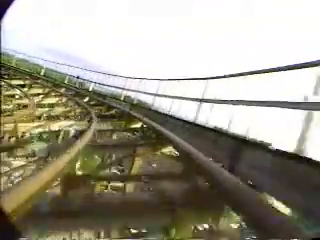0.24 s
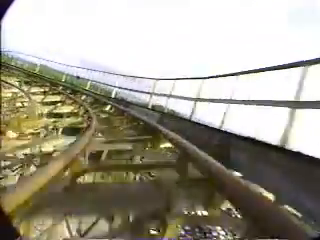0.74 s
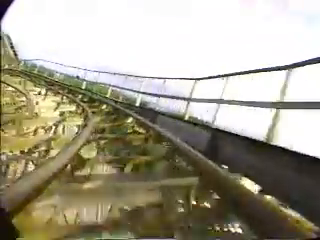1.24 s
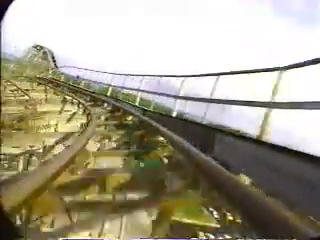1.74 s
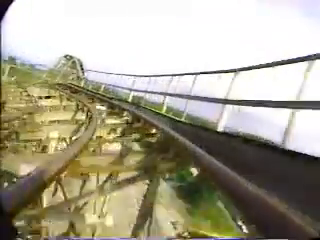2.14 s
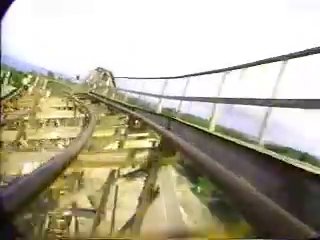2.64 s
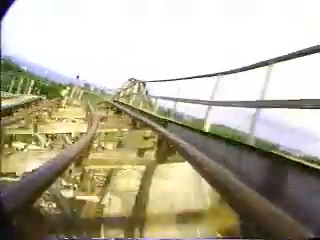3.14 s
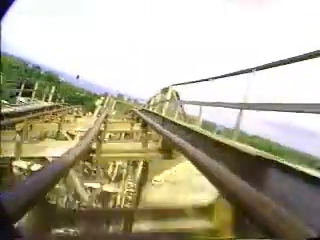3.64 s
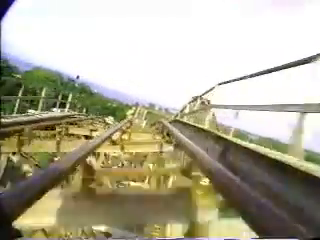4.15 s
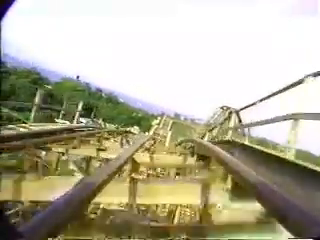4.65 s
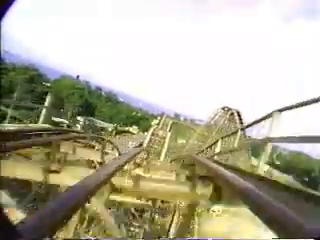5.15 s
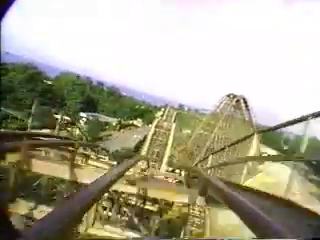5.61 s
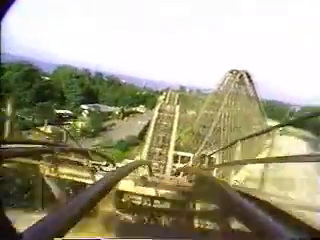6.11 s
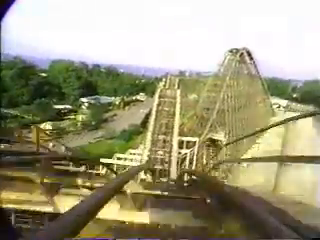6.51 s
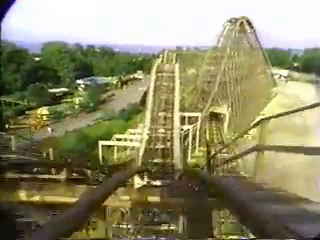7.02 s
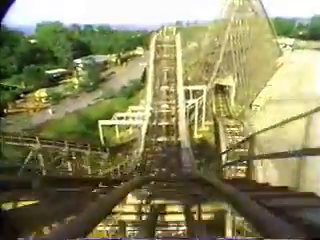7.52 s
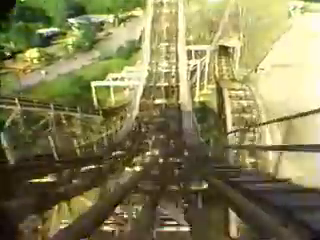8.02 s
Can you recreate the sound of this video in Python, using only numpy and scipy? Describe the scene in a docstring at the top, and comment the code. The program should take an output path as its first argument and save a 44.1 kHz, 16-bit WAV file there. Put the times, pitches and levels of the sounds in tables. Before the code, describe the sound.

A roller coaster train runs at speed on steel track, with a loud low drone, rushing air and wind thudding on the microphone.

```python
"""A roller coaster train at speed on steel track, heard from a camera on its front car.
It opens with slams of wind pressure over the drone of the car and the hiss and whistle of passing air.
The car swings over each support, jolts and chinks; gusts overload the microphone, so each big swing
of pressure flattens, chokes the hiss and comes out as a rough thud. From 5.7 to 7.3 s a raspy whistle
sets in and sags. In the last second drone and airflow swell, up to a final sharp crack and chink."""
import sys
import numpy as np
from scipy import signal
from scipy.fft import rfft, irfft, next_fast_len
from scipy.io import wavfile
from scipy.ndimage import uniform_filter1d, map_coordinates

SR = 44100
rng = np.random.default_rng(int(sys.argv[2]) if len(sys.argv) > 2 else 0)


def store_wav(level_fs):
    """Save 16-bit WAV to argv[1]."""
    pcm = np.round(np.clip(np.atleast_2d(level_fs), -1, 1) * 32767)
    wavfile.write(sys.argv[1], SR, pcm.T.astype(np.int16))


N = 364707
TIME = np.arange(N) / SR
AROUND_S = np.arange(-SR // 5, SR // 5) / SR  # time either side of an event


# Load of the wheels on the rails. Each row: time in seconds, drone level in dB.
WHEEL_LOAD = [(0, -20.5), (.6, -17.5), (1.35, -18.5), (2, -18), (2.9, -18), (3.6, -21.5), (4.35, -22.5),
              (5.15, -20.5), (5.7, -20.5), (6.3, -18.5), (6.75, -16), (7.35, -18), (7.8, -12.5),
              (8.27, -17.5)]
# The car's resonance. Each row: frequency in Hz, density in dB.
CAR_SPECTRUM = [(45, -30), (80, -9), (98, -1.5), (112, -2), (125, 0), (142, -1.5), (165, -21), (200, -17.5),
                (260, -19.5), (370, -30.5), (480, -31), (700, -39), (1500, -49.5)]

def car_drone():
    """Rolling shakes the car's low resonance at a wandering pitch."""
    load_db, = curves(WHEEL_LOAD)
    pitch = 1 + .045 * wobble(11)
    clock_s = np.cumsum(pitch / pitch.mean()) / SR
    resonance = np.interp(clock_s, TIME, noise(CAR_SPECTRUM))
    return amp(load_db) * steady(resonance, window_s=0.04)


# Swings over the track supports. Each row: centre in seconds, pitch in Hz, level in dB.
SUPPORT_SWINGS = [(0.25, 123.7, -23), (0.469, 131.7, -24), (0.93, 114.4, -17), (1.239, 134.6, -17.5),
                  (1.57, 104.5, -19.5), (1.76, 131, -22), (2.05, 129, -19), (2.3, 108.2, -15.5),
                  (2.56, 121.4, -16.5), (2.8, 121.8, -17.5), (2.98, 136.4, -18.5), (3.11, 139.3, -17),
                  (3.32, 121.7, -13.5), (3.62, 122.6, -19.5), (3.75, 115, -19.5), (3.91, 125.2, -17),
                  (4.07, 122.5, -16), (4.23, 119.3, -13.5), (4.46, 114.8, -19), (4.7, 115.6, -19),
                  (4.881, 117.7, -17), (5.3, 124.4, -16.5), (5.49, 127.6, -18), (5.63, 119.5, -20),
                  (5.78, 115.6, -13.5), (5.9, 131.7, -21), (6.12, 121.4, -19.5), (6.55, 125.3, -18.5),
                  (6.85, 134.1, -13), (7.02, 120.5, -20.5), (7.2, 114.8, -19), (7.66, 125.4, -18.5),
                  (7.92, 131.4, -13), (8.19, 134.8, -16)]

def supports(rise_hz_per_s=202, half_s=0.059, stumble_s=0.00082):
    """Each support swings the car unevenly for a dozen cycles; pitch rises as the wheels press in."""
    hum = np.zeros(N)
    envelope = np.exp(-(AROUND_S / half_s) ** 2)
    for (s, hz, db), phase in zip(SUPPORT_SWINGS, rng.random(len(SUPPORT_SWINGS))):
        cycles = phase + hz * AROUND_S + rise_hz_per_s * AROUND_S ** 2 / 2
        add(hum, s, amp(db) * np.sqrt(2) * np.sin(2 * np.pi * cycles) * envelope)
    return np.interp(TIME + stumble_s * wobble(60), TIME, hum)


# Each row: centre in seconds, shake in dB, half length in seconds, rattle in dB.
RAIL_JOLTS = [(0.239, -11.5, 0.011, -24), (0.454, -13.5, 0.0078, -37), (0.507, -6.5, 0.0082, -27.5),
              (0.758, -14, 0.0081, -25), (1.267, -16, .018, -26), (1.369, -8.5, 0.0057, -20.5),
              (1.55, -12, 0.0096, -30), (1.98, -14, 0.012, -24), (2.034, -11.5, 0.036, -24),
              (2.119, -17, 0.011, -25), (2.413, -11, 0.0073, -39), (2.573, -10, .016, -23),
              (2.833, -10, 0.03, -22), (3.111, -13, 0.021, -26), (3.4, -15, 0.015, -28.5),
              (3.496, -9, 0.015, -28.5), (3.631, -10.5, 0.023, -20.5), (3.887, -8.5, 0.015, -28.5),
              (4.424, -8, 0.0095, -23.5), (4.526, -14, 0.017, -28.5), (5.272, -8.5, 0.013, -20),
              (5.307, -16, 0.0077, -22.5), (5.469, -13.5, 0.023, -33.5), (6.506, -11, 0.0083, -27),
              (6.982, -9, 0.008, -25), (7.047, -22, 0.011, -25), (7.104, -12.5, 0.013, -21.5),
              (7.214, -10, 0.02, -20), (7.416, -5, 0.0075, -19), (7.645, -11.5, 0.014, -25),
              (7.924, -7, 0.0089, -29), (8.078, -13.5, 0.0087, -29), (8.192, -13.5, 0.026, -22.5)]

def jolts(drone, swing_top_hz=203):
    """Uneven rail drives the car's own swing much harder and rattles the wheel carriers."""
    low = unit(filtered(drone, lambda hz: 1 / (1 + (hz / swing_top_hz) ** 8)))
    analytic = signal.hilbert(low, next_fast_len(N))[:N]
    swing = analytic.real / np.hypot(np.abs(analytic), .3)  # the drone's phase at near-even height
    shake, rattle = np.zeros((2, N))
    for s, shake_db, half_s, rattle_db in RAIL_JOLTS:
        blow = bump(s, half_s)
        shake += amp(shake_db) * blow
        rattle += amp(rattle_db) * blow
    return shake * swing + rattle * carriers(swing)


# Shaken wheel carriers. Each row: frequency in Hz, density in dB.
CARRIER_SPECTRUM = [(150, -14.5), (265, 5), (400, -4), (600, -7.5), (1000, -18.5), (1800, -26.5)]

def carriers(swing, slap_share=0.58):
    """The wheel carriers slap once on each upward swing and rattle loosely in between."""
    upswings = unit(np.maximum(np.gradient(np.tanh(8 * swing)), 0))
    slaps = unit(coloured(upswings, CARRIER_SPECTRUM))
    return np.sqrt(slap_share) * slaps + np.sqrt(1 - slap_share) * noise(CARRIER_SPECTRUM)


# Each row: time in seconds, shove in dB, build-up in seconds, crack in dB.
PRESSURE_SLAMS = [(0.012, -3, 0.0043, -36.5), (.05, -7.5, 0.0041, -38), (.06, -11, 0.0099, -29.5),
                  (.123, -4, .003, -37), (0.136, -3.5, 0.0089, -38), (0.146, -15, .005, -36.5),
                  (0.177, -10, 0.029, -34), (.21, -8, .009, -33.5), (.234, -8, 0.0049, -32.5),
                  (.269, -6.5, 0.013, -34), (0.277, -4, .004, -25.5), (0.761, -7.5, .009, -26.5),
                  (0.798, -10, 0.011, -33), (1.237, -5, 0.0063, -25.5), (1.372, -12, 0.0047, -25),
                  (1.542, -6.5, 0.0046, -33.5), (2.014, -4, .008, -32.5), (2.095, -10, 0.0098, -31.5),
                  (2.57, -4.5, 0.0053, -27.5), (3.116, -9, 0.0054, -28.5), (3.619, -3.5, 0.0062, -28.5),
                  (5.27, -9.5, 0.0078, -28.5), (6.321, -3.5, 0.0098, -26.5), (6.369, -10, 0.0081, -28.5),
                  (7.093, -10, 0.0027, -28.5), (7.364, -6, 0.0067, -38.5), (7.415, -3.5, 0.0026, -30.5),
                  (7.969, -5.5, .005, -24.5), (8.032, -6.5, .007, -26), (8.11, -7, 0.014, -26),
                  (8.244, -13.5, 0.008, -15)]
# A slam's crack. Each row: frequency in Hz, density in dB.
CRACK_SPECTRUM = [(200, -5), (650, 6), (1400, 1), (2500, -4.5), (5000, -16), (7500, -37)]

def slams(rumble, flip_s=.0012, relax_s=.003, duck_share=.6):
    """Wind pressure slams the microphone: it builds, flips suddenly and cracks; the rumble dips."""
    shove, duck, crack = np.zeros((3, N))
    for s, shove_db, build_s, crack_db in PRESSURE_SLAMS:
        width_s = np.where(AROUND_S < 0, build_s, relax_s)
        envelope = np.exp(-(AROUND_S / width_s) ** 4)
        add(shove, s, amp(shove_db) * np.tanh(AROUND_S / flip_s) * envelope)
        add(duck, s, duck_share * envelope)
        add(crack, s, amp(crack_db) * decay(t60_s=0.0081))
    pressure = rumble * np.clip(1 - duck, 0, 1) + shove
    cracks = coloured(crack * rng.standard_normal(N), CRACK_SPECTRUM)
    return pressure, cracks


# Slow wind pressure. Each row: time in seconds, level in dB.
GUST_LEVELS = [(0, -16), (.2, -10), (.35, -14), (1.3, -13), (1.65, -18.5), (1.95, -9.5), (2.3, -18),
               (4.3, -22), (5.1, -18), (6.3, -19.5), (6.7, -21), (7.8, -14.5), (8.27, -12)]
# Each row: frequency in Hz, density in dB.
GUST_SPECTRUM = [(6, -24), (14, -4), (31, 2), (42, 0), (65, 1), (85, -22.5), (160, -15.5), (400, -56)]

def buffeting():
    """Large eddies press on the microphone, at and below the bottom of hearing."""
    level_db, = curves(GUST_LEVELS)
    return amp(level_db) * steady(noise(GUST_SPECTRUM), window_s=0.22)


# Airflow past the car. Each row: time in seconds, strength in dB.
AIRFLOW = [(0, -2), (.5, -3), (1.1, -0.5), (1.42, 0.5), (1.58, -2), (2, -2.5), (2.5, -1), (2.9, -1.5),
           (3.3, -.5), (4.2, 0), (4.42, 0), (4.55, -3), (4.8, -0.5), (5.4, 0), (5.7, -2), (5.95, 0),
           (6.3, 1.5), (6.6, 2.5), (6.9, 0.5), (7.42, 0), (7.6, 4.5), (8.27, 5.5)]
# Each row: centre in seconds, half length in seconds, extra hiss in dB, extra whistle in dB.
AIR_PUFFS = [(0.108, 0.018, 3, 8.5), (0.302, 0.2, 2.5, -8.5), (0.665, 0.062, 4.5, 7),
             (1.093, 0.048, 3, 5.5), (1.79, 0.051, 2.5, 13), (2.241, 0.025, 3.5, 16),
             (2.359, 0.022, 3.5, 15.5), (2.703, 0.017, 5.5, 12.5), (3.295, .045, 3.5, 5),
             (3.493, 0.066, 0, 7), (3.56, 0.035, 3, 9), (3.757, 0.079, 3, 6), (3.961, 0.045, 5, 6.5),
             (4.11, .03, 3.5, 9), (4.358, 0.094, 2, 9.5), (4.745, 0.027, 5, 10.5), (4.904, 0.055, 3.5, 12),
             (5.543, 0.069, 5.5, 9), (5.825, 0.074, 3, 9), (6.16, 0.071, 2, 6.5), (6.622, 0.11, 1.5, 5),
             (6.94, 0.055, 6, 12), (7.168, 0.016, 5, 11.5), (7.278, 0.057, 5, 10)]
# Body of the hiss. Each row: frequency in Hz, density in dB.
HISS_SPECTRUM = [(150, -2.5), (400, 8), (700, 1), (1200, -0.5), (1450, 2), (2000, -2), (2450, -1.5),
                 (3000, -7), (4300, -9), (8000, -33)]
# Treble of the hiss. Each row: frequency in Hz, density in dB.
FIZZ_SPECTRUM = [(1500, -24), (3000, -2.5), (3800, 0), (4400, 2), (5200, -1), (5700, -5), (7300, -6.5),
                 (8100, -14.5), (8800, -45)]

def airstream():
    """Air over the housing: hiss and whistle flutter together; more flow is louder and brighter."""
    flow_db, = curves(AIRFLOW)
    hiss_db = -37.5 + flow_db
    whistle_db = -51 + 1.7 * flow_db
    relative_fizz_db = -13 + 0.95 * flow_db
    for s, half_s, extra_hiss_db, extra_whistle_db in AIR_PUFFS:
        puff = bump(s, half_s)
        hiss_db += extra_hiss_db * puff
        whistle_db += extra_whistle_db * puff
    flutter = amp(1.6 * wobble(60) + wobble(260))
    hiss = eddies(noise(HISS_SPECTRUM) + amp(relative_fizz_db) * noise(FIZZ_SPECTRUM), depth_db=2.0)
    return flutter * (amp(hiss_db) * hiss + amp(whistle_db) * whistle())


# Each row: centre in Hz, half width in Hz, relative level in dB.
EDGE_TONES = [(3483, 170, -5.5), (4886, 240, 0), (6500, 230, -19), (7240, 180, -18)]

def whistle():
    """Air on the housing's edges sounds breathy tones that waver together; rms 1."""
    drift_s = np.cumsum(.006 * wobble(22)) / SR
    tones = np.zeros(N)
    for centre_hz, width_hz, db in EDGE_TONES:
        band = unit(noise_band(centre_hz, width_hz))
        tones += amp(db + 1.9 * wobble(31)) * band
    wavering = np.interp(TIME + drift_s, TIME, eddies(tones, depth_db=3.0))
    chatter = amp(1.9 * wobble(110))
    return unit(chatter * wavering)


def eddies(x, depth_db):
    """Passing eddies favour narrow bands of x for a few hundredths of a second each; rms 1."""
    spectra = signal.stft(x, nperseg=1024)[2]
    patches = uniform_filter1d(rng.standard_normal(spectra.shape), size=4, axis=0)
    patches = uniform_filter1d(patches, size=6, axis=1)
    return unit(signal.istft(spectra * amp(depth_db * unit(patches)), nperseg=1024)[1][:N])


# Each row: time in seconds, pitch in Hz, level in dB.
WHISTLE_GLIDE = [(5.68, 4910, -75), (5.8, 4850, -46), (6, 4875, -43), (6.07, 4720, -52),
                 (6.14, 4746, -42.5), (6.27, 4690, -44.5), (6.32, 4810, -57), (6.38, 4790, -49),
                 (6.62, 4780, -51), (6.95, 4880, -51.5), (7.3, 4950, -79)]
# Each row: multiple of the pitch, relative level in dB.
WHISTLE_PARTIALS = [(.705, -1.5), (1, -0.5), (1.075, -5.5)]

def ringing_whistle():
    """Air on an edge sounds a narrow, raspy whistle whose partials sag in pitch together."""
    pitch_hz, level_db = curves(WHISTLE_GLIDE)
    pitch_hz *= 1 + 0.0026 * wobble(25)
    partials = sum(amp(db) * rough_tone(ratio * pitch_hz) for ratio, db in WHISTLE_PARTIALS)
    return amp(level_db) * unit(partials)


# Each row: start in seconds, level in dB.
STEEL_TAPS = [(.862, -33.5), (1.349, -37), (1.857, -35.5), (2.061, -35.5), (3.064, -34), (3.263, -41.5),
              (3.495, -29.5), (6.375, -32), (7.156, -28), (8.033, -28), (8.046, -38.5), (8.177, -34),
              (8.244, -22.5)]
# Each row: frequency in Hz, relative level in dB.
STEEL_MODES = [(3480, -5.5), (4100, -11), (4900, 1.5), (6900, -13.5)]

def chinks(attack_s=0.0021, detune_share=0.0073, scatter_db=2):
    """A loose steel part is tapped and rings briefly, a little differently each time."""
    ringing = np.zeros(N)
    envelope = decay(t60_s=0.054) * (1 - np.exp(-np.abs(AROUND_S) / attack_s))
    for s, tap_db in STEEL_TAPS:
        for hz, mode_db in STEEL_MODES:
            detune, scatter = rng.standard_normal(2)
            mode = np.sin(2 * np.pi * hz * (1 + detune_share * detune) * AROUND_S)
            add(ringing, s, amp(tap_db + mode_db + scatter_db * scatter) * envelope * mode)
    roughness = amp(4.9 * wobble(380))
    return ringing * roughness


def microphone(pressure, push_limit=0.4, pull_limit=0.26, knee=2.9, leak=0.031, cut_hz=75.2, q=0.78):
    """The capsule saturates, sooner on the pull; its bass cut turns the flattened swings into cusps."""
    limit = np.where(pressure > 0, push_limit, pull_limit)
    flattened = pressure / (1 + np.abs(pressure / limit) ** knee) ** (1 / knee) + leak * pressure
    lopsided = flattened + 0.47 * flattened ** 2
    return filtered(lopsided, lambda hz: -hz ** 2 / (cut_hz ** 2 - hz ** 2 + 1j * hz * cut_hz / q))


def amp(db):
    """Decibels to gain."""
    return 10 ** (np.asarray(db) / 20)


def unit(x):
    """x at rms 1."""
    return x / np.sqrt(np.mean(x ** 2) + 1e-20)


def curves(rows):
    """One value per sample for each column after the time."""
    s, *columns = np.transpose(rows)
    return [np.interp(TIME, s, column) for column in columns]


def wobble(knots_per_s):
    """A smooth random curve."""
    coarse_s = np.linspace(0, TIME[-1], N // 32)
    knots = rng.standard_normal(len(coarse_s))
    return np.interp(TIME, coarse_s, map_coordinates(knots, [coarse_s * knots_per_s + 2], mode="wrap"))


def filtered(x, response):
    """x through a complex response of frequency in Hz."""
    size = next_fast_len(N + SR // 2)
    return irfft(rfft(x, size) * response(np.fft.rfftfreq(size, 1 / SR)), size)[:N]


def coloured(x, spectrum):
    """x shaped by (Hz, dB) points, with its rms kept."""
    points_hz, db = np.transpose(spectrum)
    gain = lambda hz: amp(np.interp(np.log(hz + 1), np.log(points_hz + 1), db, right=-120))
    return np.std(x) * unit(filtered(x, gain))


def noise(spectrum):
    """Noise of rms 1 shaped by (Hz, dB) points."""
    return coloured(rng.standard_normal(N), spectrum)


def noise_band(centre_hz, width_hz):
    """Noise that is 6 dB down at width_hz from its centre."""
    return filtered(rng.standard_normal(N), lambda hz: 1 / (1 + ((hz - centre_hz) / width_hz) ** 2))


def rough_tone(pitch_hz, width_hz=58):
    """A narrow, rough partial of rms 1 along a pitch curve."""
    phase = 2 * np.pi * np.cumsum(pitch_hz) / SR
    return unit(noise_band(0, width_hz) * np.cos(phase) + noise_band(0, width_hz) * np.sin(phase))


def steady(x, window_s):
    """x at rms 1, with swells slower than the window evened out."""
    power = np.abs(uniform_filter1d(x ** 2, int(window_s * SR) + 1))
    power = uniform_filter1d(power, int(window_s * SR / 2) + 1)
    return unit(x / np.sqrt(power + 1e-6))


def add(track, s, shape):
    """Mix a shape into the track, centred on time s."""
    at = round(s * SR) - len(shape) // 2 + np.arange(len(shape))
    inside = (at >= 0) & (at < N)
    track[at[inside]] += shape[inside]


def bump(s, half_s):
    """A smooth rise and fall of height 1 around time s."""
    track = np.zeros(N)
    add(track, s, np.exp(-(AROUND_S / half_s) ** 2))
    return track


def decay(t60_s):
    """Silence before a blow, then a decay from 1."""
    return (AROUND_S >= 0) * np.exp(-np.log(1000) * np.abs(AROUND_S) / t60_s)


def scene():
    """Sharp cracks and bright chinks sound over the overloaded drone and hiss."""
    drone = car_drone() + supports()
    rumble, cracks = slams(drone + jolts(drone) + buffeting())
    overloaded = microphone(rumble + airstream() + ringing_whistle())
    return (overloaded + cracks + chinks())[None]


# The camera's motor whine. Each row: frequency in Hz, level in dB.
MOTOR_TONES = [(5755, -71), (7193, -75), (7913, -77)]
# The camera's own hiss. Each row: frequency in Hz, density in dB.
SELF_NOISE_SPECTRUM = [(100, -1), (2000, -0.5), (5000, -3.5), (7500, -2), (8700, -24)]

def record(dry, hiss_db=-57.0, top_hz=8750):
    """The camera adds a faint motor whine and hiss, and limits the band."""
    whine = sum(amp(db) * np.sqrt(2) * np.sin(2 * np.pi * hz * TIME) for hz, db in MOTOR_TONES)
    hiss = amp(hiss_db) * noise(SELF_NOISE_SPECTRUM)
    return filtered(dry[0] + whine + hiss, lambda hz: hz < top_hz)[None]


dry = scene()
out = record(dry)
store_wav(out)
```